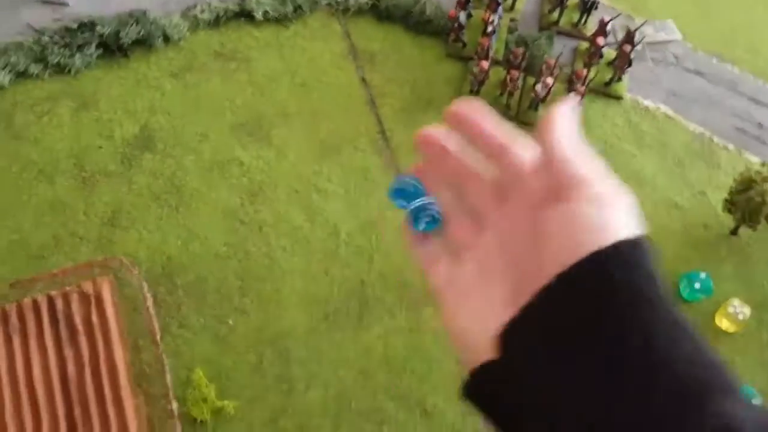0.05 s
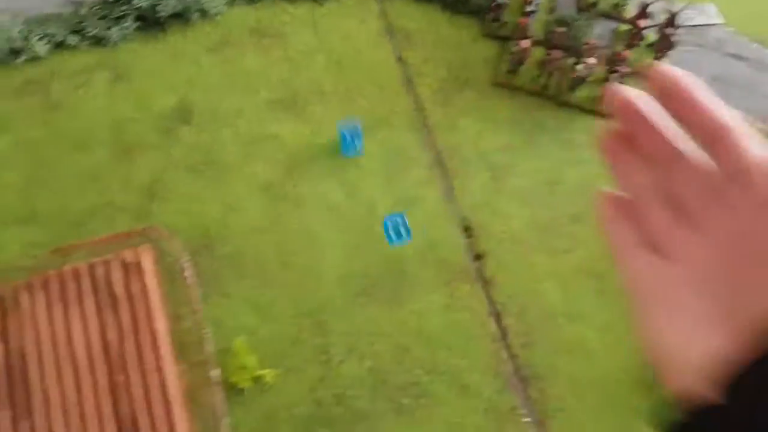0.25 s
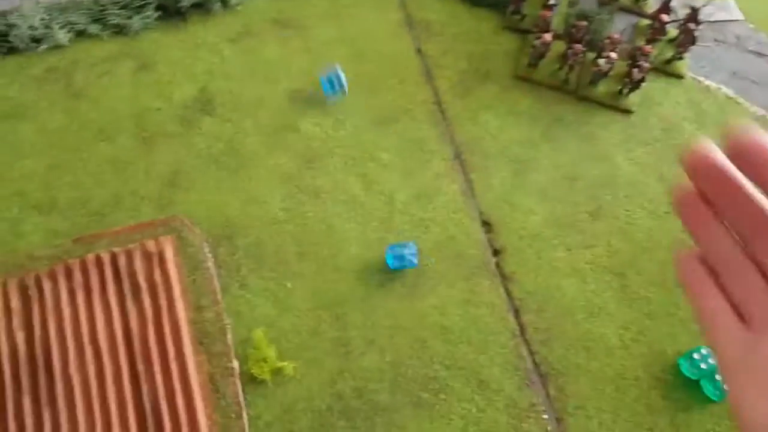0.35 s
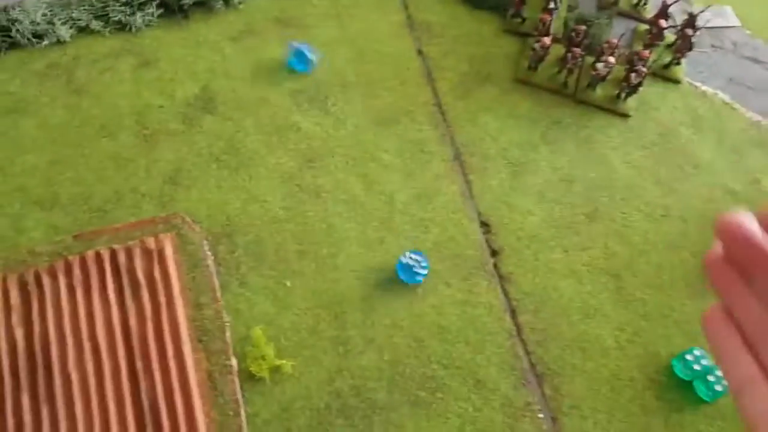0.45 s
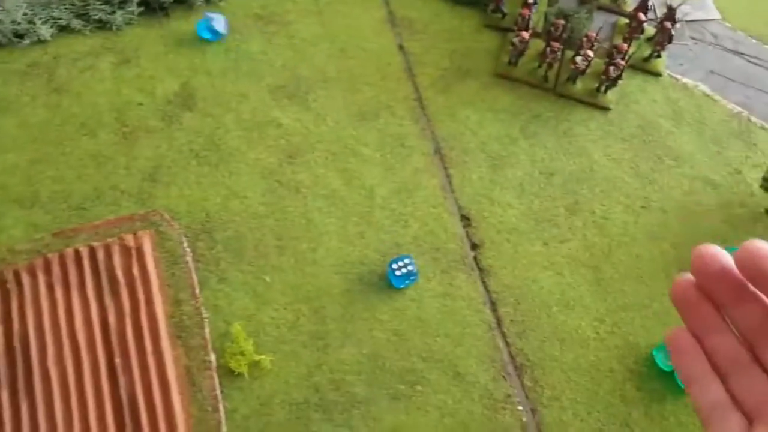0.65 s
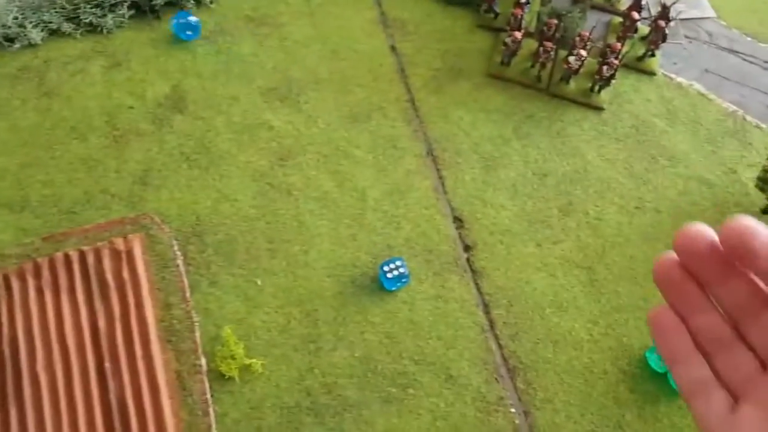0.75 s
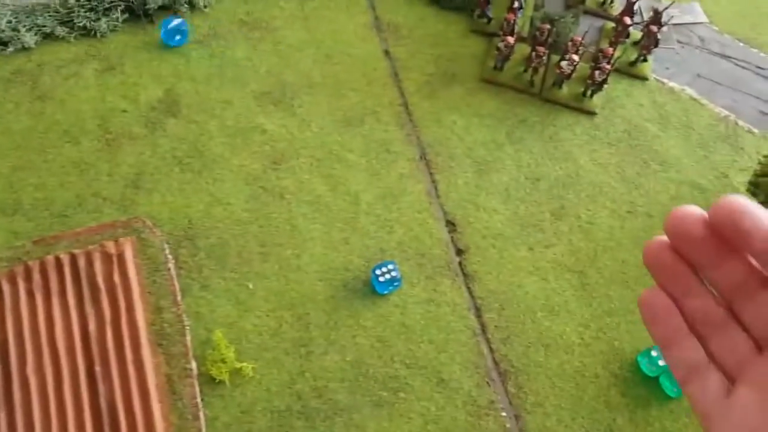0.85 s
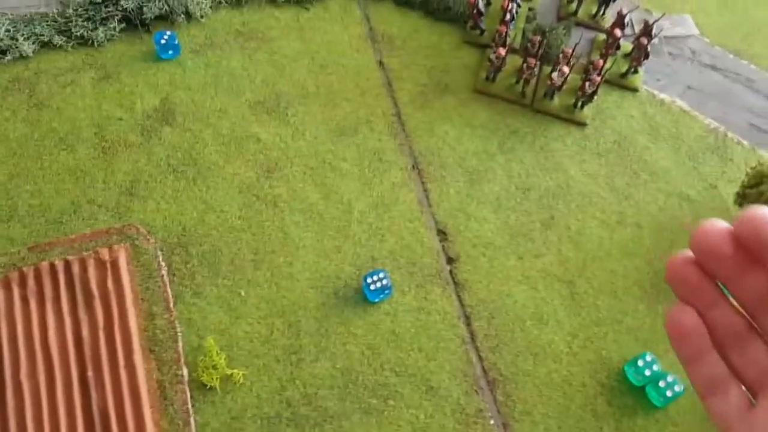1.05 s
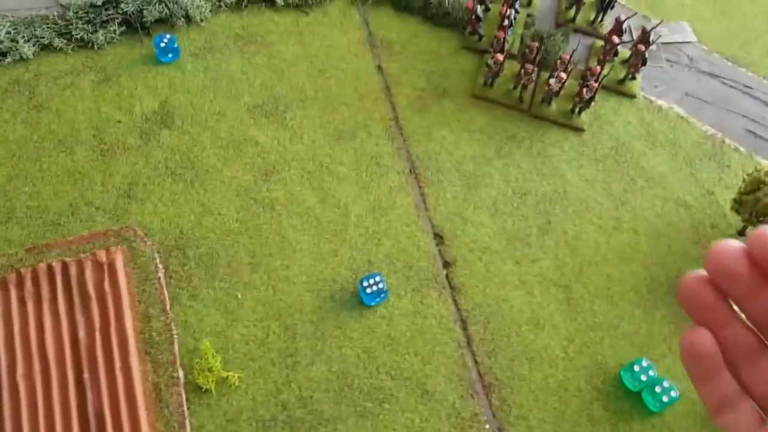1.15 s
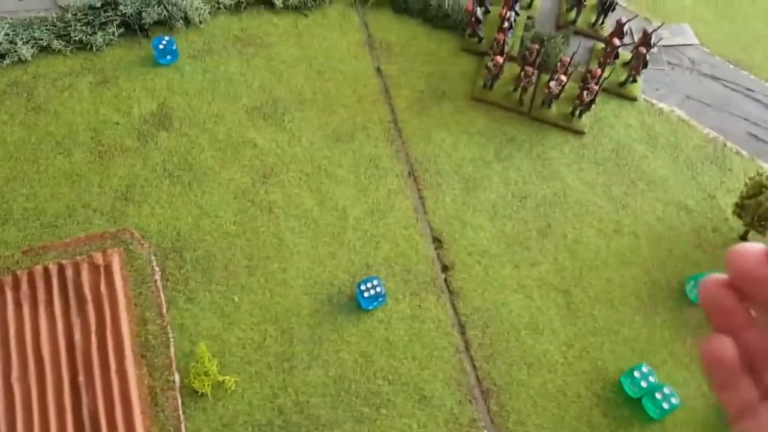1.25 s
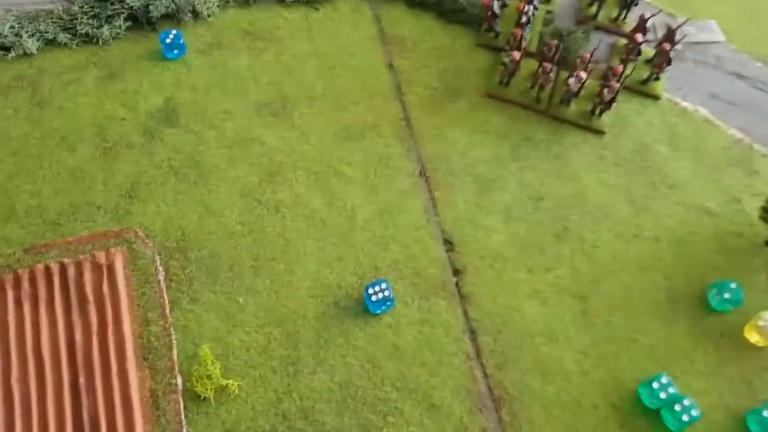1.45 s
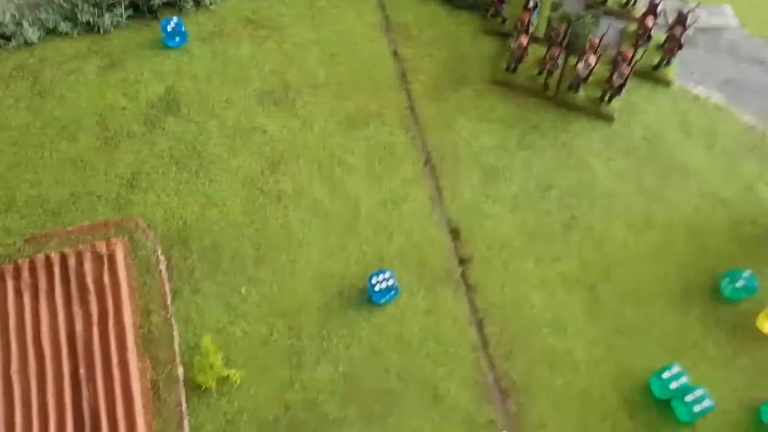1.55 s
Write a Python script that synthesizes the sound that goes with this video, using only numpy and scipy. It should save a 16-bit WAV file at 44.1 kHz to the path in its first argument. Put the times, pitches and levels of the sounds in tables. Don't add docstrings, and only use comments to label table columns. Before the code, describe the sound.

Dice hit a fuzzy mat over a wooden table. Tiny bright plastic ticks come from the palm until 0.1 seconds, with faint sleeve rustle. Two hard knocks with woody thumps land at 0.2 and 0.26, a firm bounce at 0.38, then fading bounces until 0.58. Dry fibre scuffs and soft tipping taps trail past 1 second, leaving quiet room air and low motor hum. Close, left-leaning stereo.

```python
import sys
import numpy as np
from scipy import signal
from scipy.fft import rfft, irfft
from scipy.io import wavfile
from scipy.ndimage import uniform_filter1d, map_coordinates

SR = 44100
rng = np.random.default_rng(int(sys.argv[2]) if len(sys.argv) > 2 else 0)


def natural_amplitude(level_db):
    exponent = np.asarray(level_db, float) / 20
    return 10 ** exponent


def master(y):
    cut = np.clip(np.atleast_2d(y).T, -1, 1)
    pcm = np.round(cut * 32767)
    wavfile.write(sys.argv[1], SR, pcm.astype(np.int16))


N = 70560
T = np.arange(N) / SR

# (time [s], thump level [dB], knock level [dB], contact [ms], thump pitch [Hz])
LANDINGS = [
    (0.2024, -15.5, -20.5, 0.12, 537),
    (0.2562, -13.5, -21, 0.1, 370),
    (0.3084, -23.5, -58, 1, 263),
    (0.3843, -21, -24.5, 0.23, 400),
    (0.3937, -28.5, -52, 0.27, 300),
    (0.4277, -31.5, -51, 0.71, 365),
    (0.4664, -26, -33.5, 0.25, 270),
    (.489, -39.5, -44, 0.46, 273),
    (0.5089, -39.5, -46, 0.3, 400),
    (0.575, -41, -47, 0.61, 346),
]


def ring(hz, t60, size=4096):
    t = np.arange(size) / SR
    return np.sin(2 * np.pi * hz * t) * np.exp(-np.log(1000) * t / t60)


def add(out, x, s):
    i = max(int(s * SR), 0)
    out[..., i:i + x.shape[-1]] += x[..., :N - i]


def colour(x, points):
    hz, db = np.array(points).T
    f = np.maximum(np.arange(N // 2 + 1) * SR / N, 1)
    gain = natural_amplitude(np.interp(np.log(f), np.log(hz), db))
    y = irfft(rfft(x) * gain, N)
    return y / np.sqrt(np.mean(y ** 2))


def walk(rate):
    k = int(SR / rate)
    steps = np.repeat(rng.standard_normal(N // k + 1), k)
    return 0.41 * uniform_filter1d(uniform_filter1d(steps, k), k)[:N]


def wide(points):
    mid, side = (colour(rng.standard_normal(N), points) for _ in range(2))
    side = signal.lfilter(*signal.butter(1, 300, "high", fs=SR), side)
    return np.array([mid + side, mid - side]) / np.sqrt(2)


def landings():
    # (frequency [Hz], level [dB], t60 [s])
    knock_modes = [(1570, 1.5, 0.011), (1865, 4.2, 0.0054), (2345, -0.1, 0.0061), (4550, -11, 0.014),
                   (6250, -13, 0.0066), (1271, -10, 0.014), (3130, -14, .01), (3560, -20, 0.012),
                   (5250, -13, .006)]
    # (frequency [Hz], level [dB], t60 [s])
    table_modes = [(166, -22, 0.41), (196.8, -3.5, 0.8), (236, -4, 0.083), (263.2, 4, 0.29),
                   (310.7, -5.5, 0.28), (362, -2.5, 0.49), (390.2, -5, 0.39), (459.7, -13, 0.45),
                   (518.7, 3, 0.25), (605.7, -1, 0.18), (685.4, -10, 0.25), (776, 0, 0.13),
                   (1050, -4, 0.073), (121.7, 11, .5)]
    table_db, spot_db, knock_spread = -28.5, 2.5, 0.02
    thump_t60_s, thump_rise_ms = 0.01, 0.04
    size = 30000
    rise = 1 - np.exp(-T[:size] * 1000 / thump_rise_ms)
    out = np.zeros((2, N))
    spots = rng.standard_normal((len(LANDINGS), 48))
    for (s, db, knock_db, ms, hz), spot in zip(LANDINGS, spots):
        u = np.arange(64) / SR / (max(ms, .05) / 1000)
        push = np.where(u < 1, np.sin(np.pi * u) ** 2, 0)
        knock = np.zeros(size)
        for k, (f, g, t60) in enumerate(knock_modes):
            knock += natural_amplitude(g + 3.3 * spot[k]) * ring(f * (1 + knock_spread * spot[k + 36]), t60, size)
        table = np.zeros(size)
        for k, (f, g, t60) in enumerate(table_modes):
            table += natural_amplitude(g + spot_db * spot[16 + k]) * ring(f, t60, size)
        overtone = natural_amplitude(-11 + .045 * (hz - 380)) * ring(1.68 * hz, thump_t60_s, size)
        thump = (ring(hz, thump_t60_s, size) + overtone) * rise
        x = np.array([natural_amplitude(db) * (thump + natural_amplitude(table_db) * table), natural_amplitude(knock_db) * knock])
        add(out, -signal.fftconvolve(x, push[None] / push.sum(), axes=1), s)
    return signal.sosfilt(signal.butter(6, 178, "high", fs=SR, output="sos"), out)


def ticks():
    # (time [s], level [dB], ring pitch [Hz])
    touches = [(.0021, -42, 5770), (0.0084, -70, 5500), (0.0144, -56, 4700), (0.0406, -30.5, 7980),
               (0.0879, -48, 5500), (0.0894, -44.5, 4700), (0.0995, -38, 5900), (.988, -57, 12000),
               (0.993, -53.5, 11400), (1.033, -55.5, 12000), (1.071, -65, 11500), (1.078, -62, 11000),
               (1.129, -64, 12600)]
    t60_s, rise_ms, gain_db = 0.0011, 0.066, 11
    out = np.zeros(N)
    for s, db, hz in touches:
        x = ring(hz, t60_s)
        x = x + natural_amplitude(-17) * ring(1.7 * hz, t60_s)
        x = x + natural_amplitude(-10) * ring(.45 * hz, 2 * t60_s)
        rise = 1 - np.exp(-T[:len(x)] * 1000 / rise_ms)
        add(out, -natural_amplitude(db + gain_db) * x * rise, s)
    return out


def scuffs():
    # (time [s], level
    # [dB], length [ms], body level [dB])
    skids = [(.2029, -39, 1.1, -25), (.2048, -47, 1.2, -25), (.2071, -45, 1.1, -20), (.2565, -40, 1.2, -25),
             (.2585, -52, 1.6, -20), (.3068, -58, 1.8, -10), (.3103, -48, 1.2, -6), (.3121, -44, 1.7, -5),
             (.3849, -41, 1.1, -20), (.3865, -51, 1.4, -20), (.3940, -51, 1.6, -8), (.4275, -47, 1.3, -8),
             (.4290, -52, 1.5, -6), (.4600, -55, 2.6, -2), (.4667, -51, 1.2, 4), (.5045, -58, 1.4, -15),
             (.6080, -53, 3.4, 1),
             (.4530, -54, 0.97, -19), (0.4915, -50, 2.9, -8), (0.509, -58.5, 4.6, -16),
              (.5170, -60, 4.7, -17), (0.549, -68, 4.1, -19), (.5540, -56.5, 9.8, -31), (0.56, -64, 3.4, 6),
              (0.577, -61, 2.4, -4), (0.601, -57, 4.6, -1), (0.621, -57.5, 8.7, -13),
              (0.6374, -53.5, 0.86, 3), (0.669, -62.5, 4.2, -2), (0.679, -63.5, 4.3, 6),
              (.7400, -57.5, 2.9, 1.5), (0.731, -64, 5.4, -6), (0.744, -68, 12.6, -18),
              (0.9378, -60, 8.4, 4.5), (0.969, -74, 19, 4), (1.013, -66.5, 14.6, 3), (1.037, -69, 9.3, 4)]
    # (frequency [Hz], level [dB])
    fibre_points = [(2500, -3), (4000, -4), (6000, -3), (8500, 1), (10500, 1), (12500, 2), (15000, 1),
                    (17000, -6)]
    body_hz, body_width_hz = 2100, 800
    grains_per_s, grain_db = 26000, 1.2
    crack_db, crack_ms = -36, 2
    rise_share = 0.98
    snaps = (rng.random(N) < grains_per_s / SR) * natural_amplitude(grain_db * rng.exponential(size=N))
    snaps = snaps * rng.standard_normal(N)
    body = colour(snaps, [(body_hz - body_width_hz, -20), (body_hz, 0), (2900, -8), (3600, -5),
                          (5000, -20), (8000, -40)])
    fibre = colour(snaps, [(800, -1)] + fibre_points)
    crush = np.zeros(N)
    for s, _, db, *_ in LANDINGS:
        crush += natural_amplitude(db + crack_db) * (T > s) * np.exp(-np.abs(T - s) * 1000 / crack_ms)
    out = crush * fibre
    for s, db, ms, body_db in skids:
        u = (T - s) * 1000 / ms
        swell = np.exp(-(u / np.where(u < 0, rise_share, 1)) ** 2)
        out += natural_amplitude(db) * swell * (fibre + natural_amplitude(body_db) * body)
    return out


def far_side(board, knock, tick, fine, other):
    lag_ms, knock_lag_ms = 0.16, 0.12

    def late(x, ms):
        return map_coordinates(x, [(T - ms / 1000) * SR], mode="nearest")

    far = late(board, lag_ms) + natural_amplitude(-7.5) * late(knock, knock_lag_ms)
    far = far + natural_amplitude(-14.5) * late(fine + 1.5 * other, lag_ms)
    return far + natural_amplitude(-12) * late(tick, lag_ms)


def brushes():
    # (time [s], level [dB], length [ms])
    taps = [(0.787, -70.5, 9.5), (0.814, -66.5, 9.9), (0.831, -61, 2.3), (.858, -72, 9.7),
            (0.885, -65, 2.4), (0.906, -58, 4.1), (0.947, -57.5, 1.5), (.958, -66, 5.5), (.977, -68, 9.1),
            (1.156, -71, 12), (1.191, -69, 8.6), (1.226, -72, 42), (1.292, -74, 22)]
    # (frequency [Hz], level [dB])
    tap_points = [(300, 2), (550, 17), (1000, 13.5), (1500, 0), (3000, -30)]
    level = sum(natural_amplitude(db) * np.exp(-((T - s) * 1000 / ms) ** 2) for s, db, ms in taps)
    return wide(tap_points) * level


def jolts():
    jolt_db, t60_s, size = -48, 0.31, 9000
    shake = ring(40, t60_s, size) + natural_amplitude(7) * ring(87.2, t60_s, size)
    shake = shake * np.minimum(np.arange(size) / SR / 0.0052, 1)
    out = np.zeros(N)
    for s, db, *_ in LANDINGS:
        add(out, natural_amplitude(db + jolt_db) * shake, s)
    return out


def sleeve():
    # (time [s], level [dB])
    movement = [(0, -59.5), (.04, -62.5), (.11, -66), (.17, -72), (.45, -62), (.65, -63.5), (.8, -78.5),
                (1.0, -74.5), (1.2, -75), (1.6, -80.5)]
    # (frequency [Hz], level [dB])
    cloth = [(180, -34.5), (300, -2.5), (624, -9.5), (842, -16), (1970, -2.5), (4670, -18.5),
             (15000, -28.5), (16000, -55)]
    level_db = np.interp(T, *np.array(movement).T) + 1 * walk(41.7)
    balance = natural_amplitude(np.array([[1.5], [-1.5]]))
    return natural_amplitude(level_db) * wide(cloth) * balance


def room(x):
    # (frequency [Hz], t60 [s], level [dB])
    bands = [(193, 0.74, -35), (400, 0.45, -33.5), (698, 0.37, -21), (1750, 0.57, -27), (3700, 0.54, -14),
             (5800, 0.15, -22), (11000, 0.37, -9)]
    t = np.arange(30000) / SR
    out = 0
    for hz, t60, db in bands:
        band = signal.butter(2, [hz / 1.76, hz * 1.41], "band", fs=SR, output="sos")
        mid, side = signal.sosfilt(band, rng.standard_normal((2, len(t))))
        side = min(hz / 1500, 1) * side
        fade = np.exp(-np.log(1000) * t / t60) * np.minimum(t / 0.00043, 1)
        tail = np.array([mid + side, mid - side]) * fade
        out = out + natural_amplitude(db) * tail / np.sqrt(np.sum(tail ** 2) * hz / SR)
    return signal.fftconvolve(x[None], out * 0.2, axes=1)[:, :N]


def air():
    # (frequency [Hz], level [dB])
    air_points = [(25, -1.5), (50, -9.5), (120, 2), (200, -4), (500, -12), (2200, -21), (5000, -29),
                  (13000, -32.5)]
    return natural_amplitude(-66.5 + 1.2 * walk(2.1)) * wide(air_points)


def hum():
    # (multiple of the shaft speed, level [dB])
    tones = [(2, -88), (3, -62.5), (4, -69.5), (6, -84)]
    shaft_hz, wobble_db = 24.9, .6
    phase = 2 * np.pi * np.cumsum(shaft_hz * (1 + .005 * walk(4))) / SR
    return sum(natural_amplitude(db + wobble_db * walk(24)) * np.sin(k * phase) for k, db in tones)


def scene():
    board, knock = landings()
    tick = ticks()
    fine, other = scuffs(), scuffs()
    dice = board + knock + tick + fine
    mix = np.array([dice, far_side(board, knock, tick, fine, other)])
    mix = mix + brushes() + jolts() + sleeve()
    return mix + room(dice) + air() + hum()


def band_limit(x):
    return signal.sosfilt(signal.butter(12, 16490, fs=SR, output="sos"), x)


def record(dry):
    x = signal.sosfilt(signal.butter(2, 30, "high", fs=SR, output="sos"), dry)
    x = signal.sosfilt(signal.cheby1(10, .3, 15600, fs=SR, output="sos"), x)
    return band_limit(x)


dry = scene()
out = record(dry)
master(out)
```